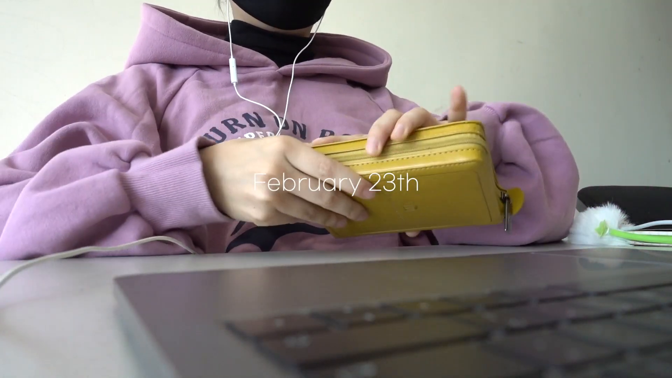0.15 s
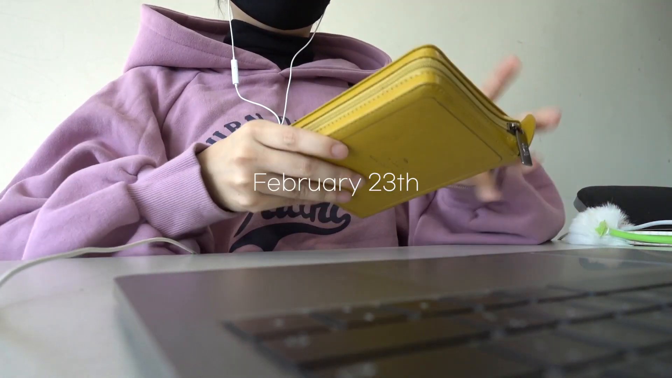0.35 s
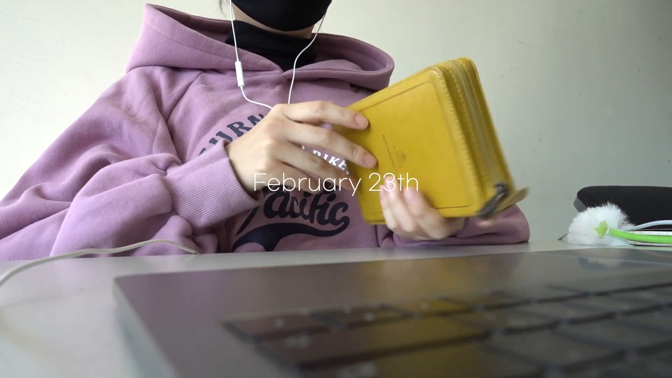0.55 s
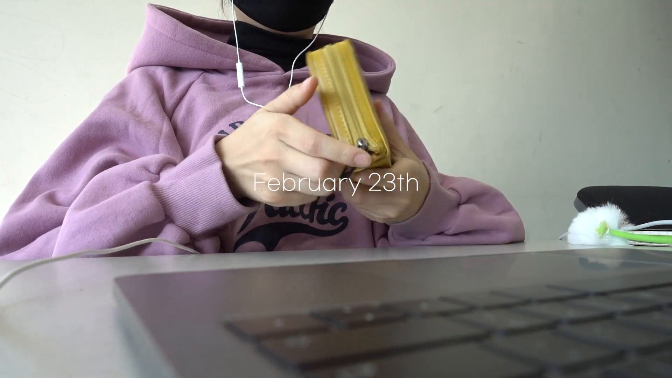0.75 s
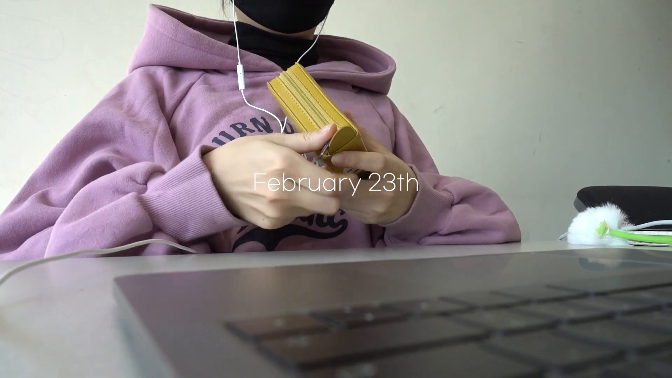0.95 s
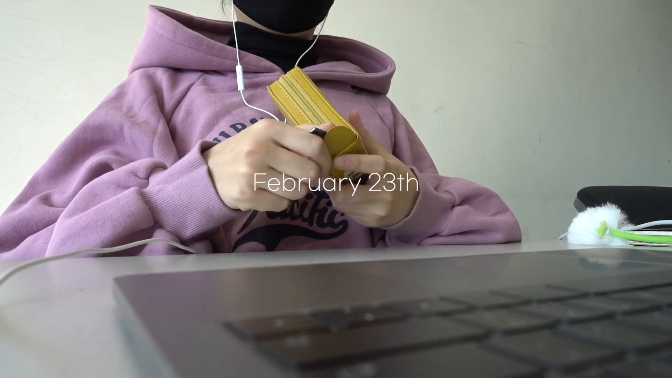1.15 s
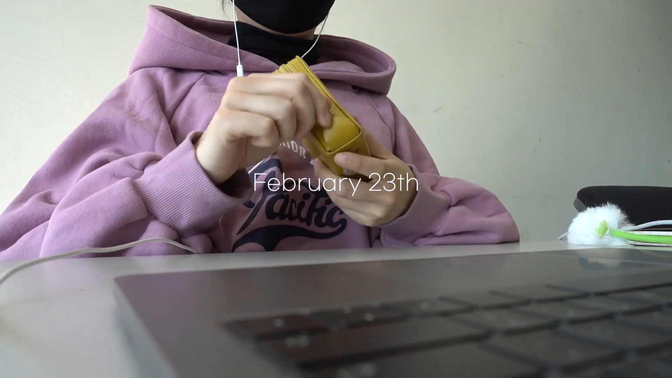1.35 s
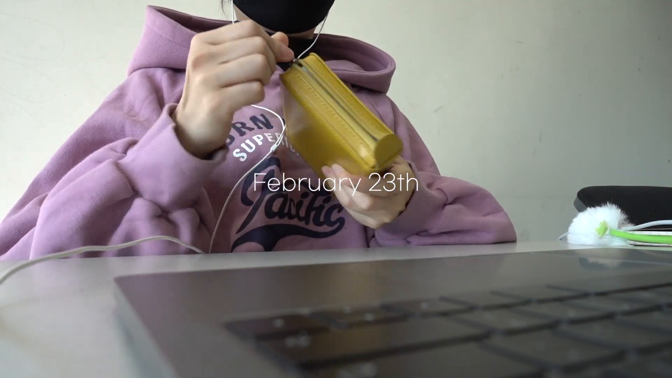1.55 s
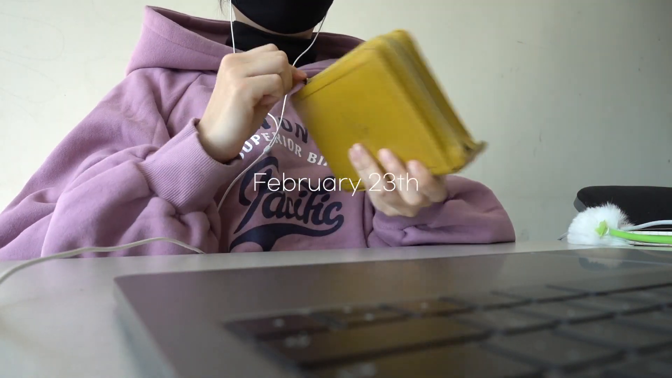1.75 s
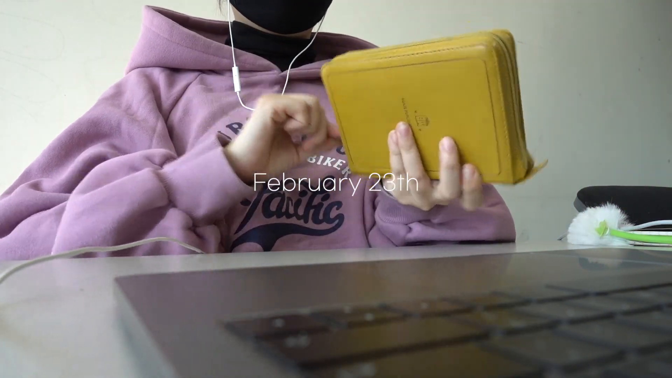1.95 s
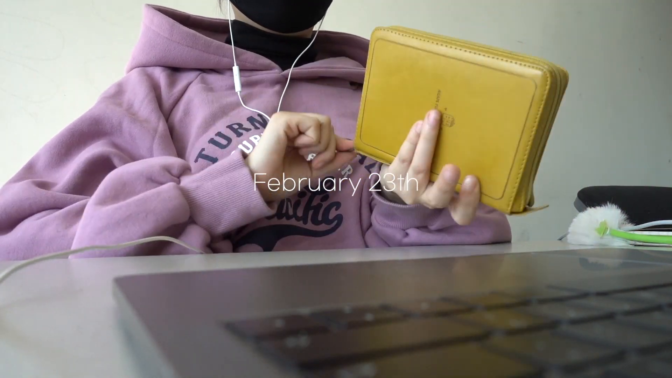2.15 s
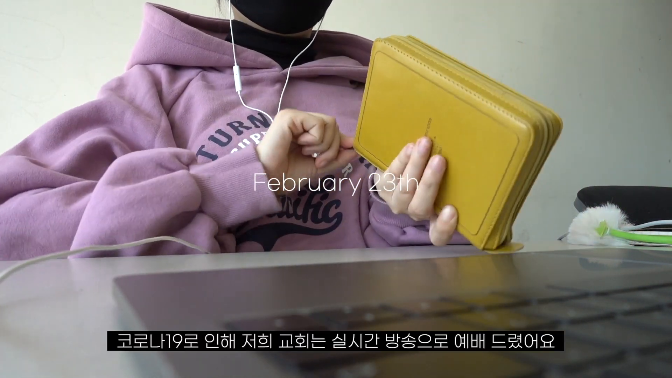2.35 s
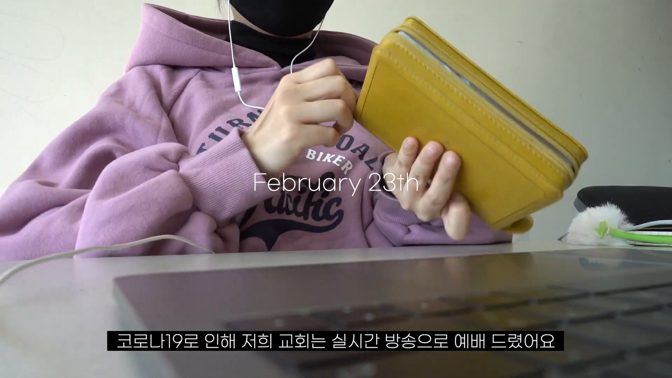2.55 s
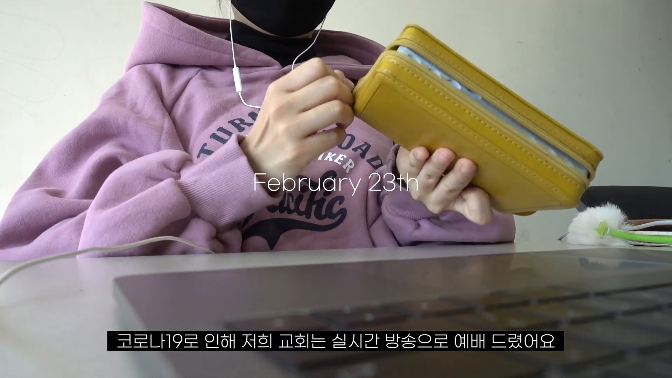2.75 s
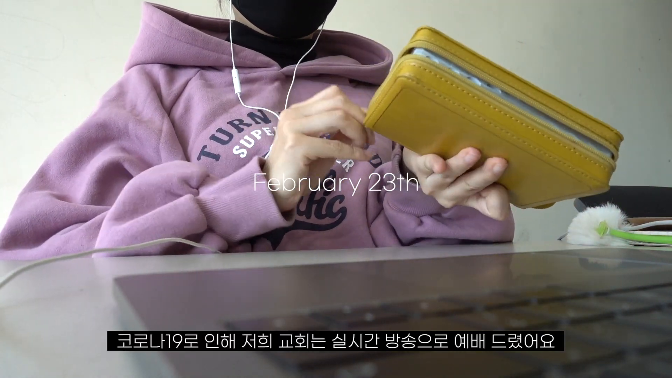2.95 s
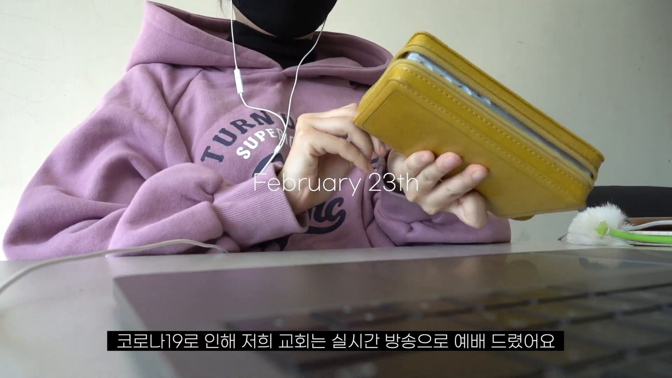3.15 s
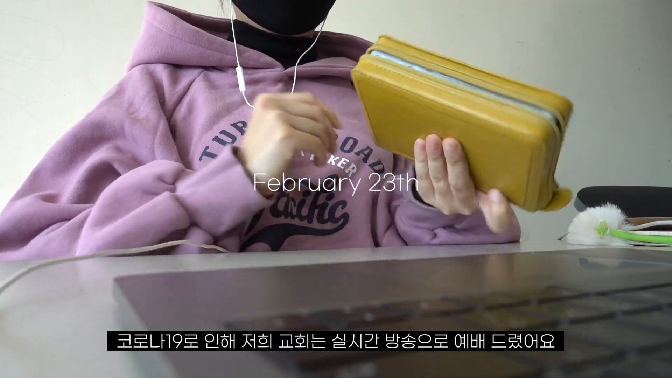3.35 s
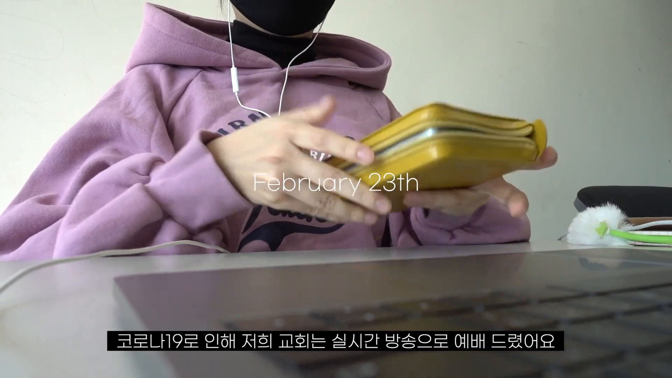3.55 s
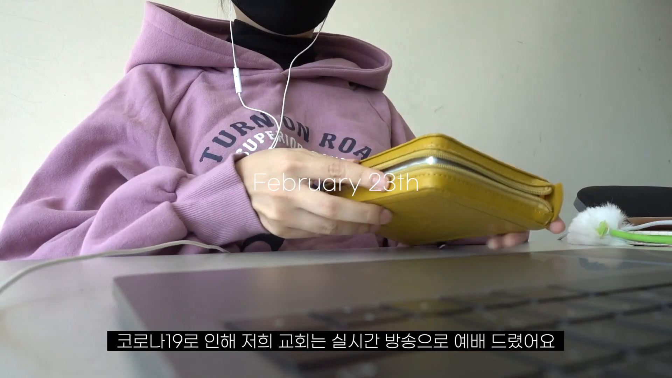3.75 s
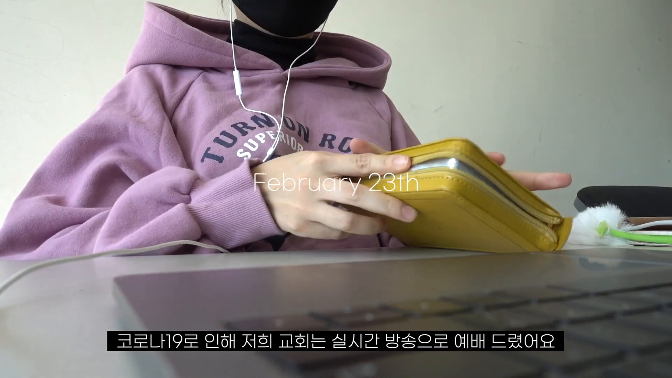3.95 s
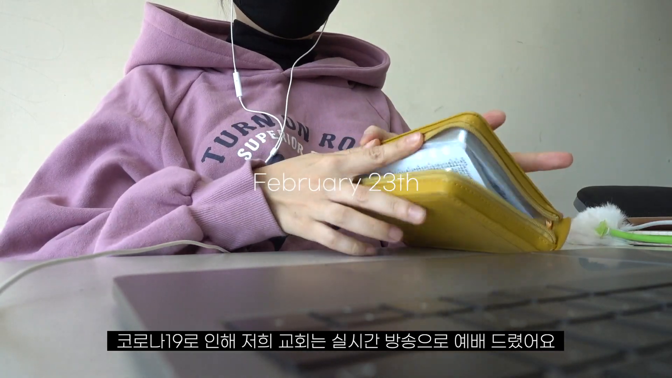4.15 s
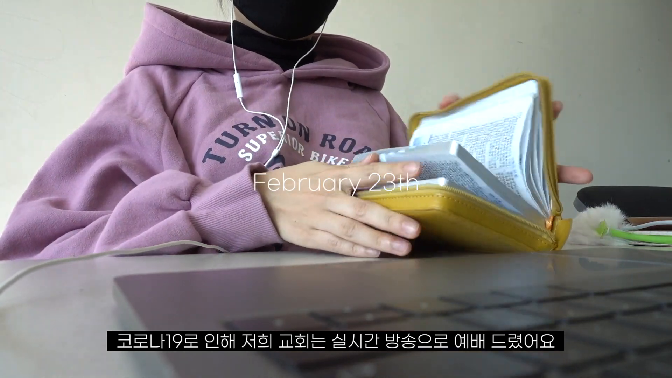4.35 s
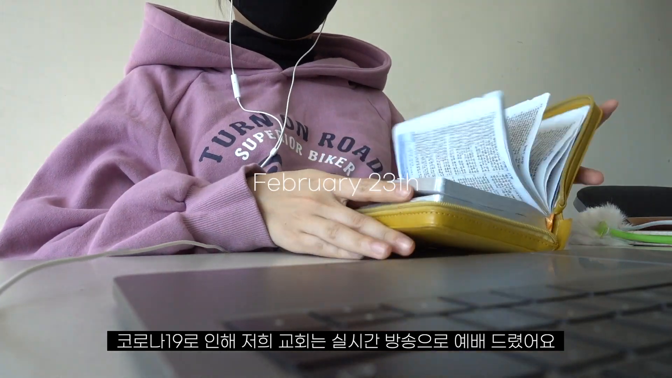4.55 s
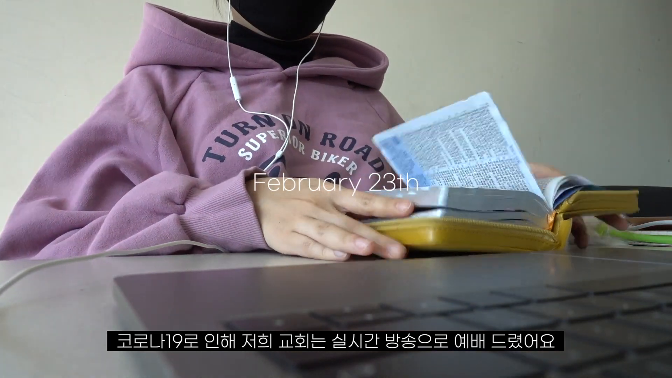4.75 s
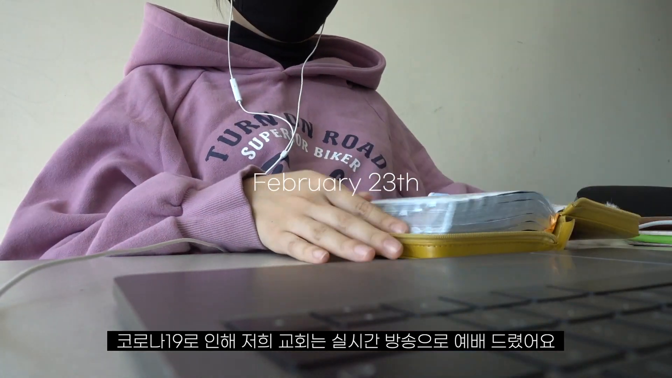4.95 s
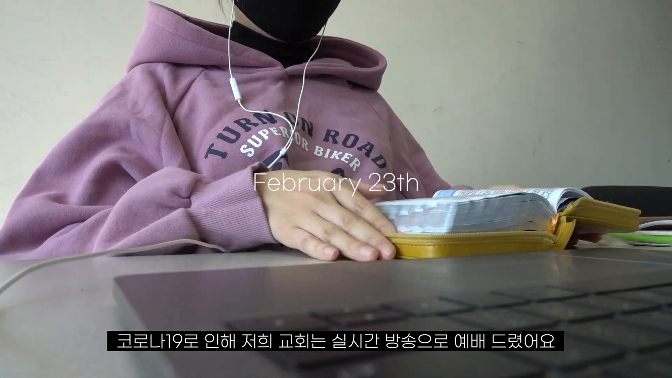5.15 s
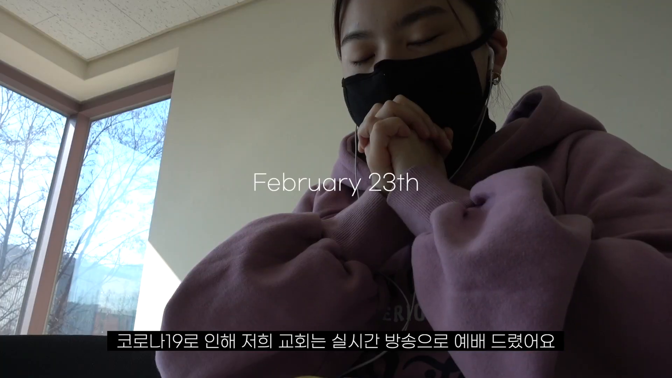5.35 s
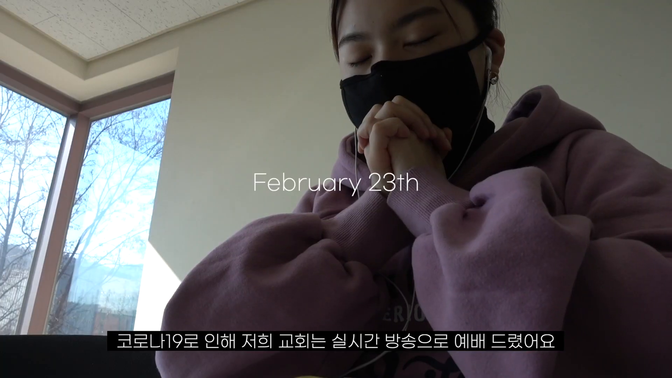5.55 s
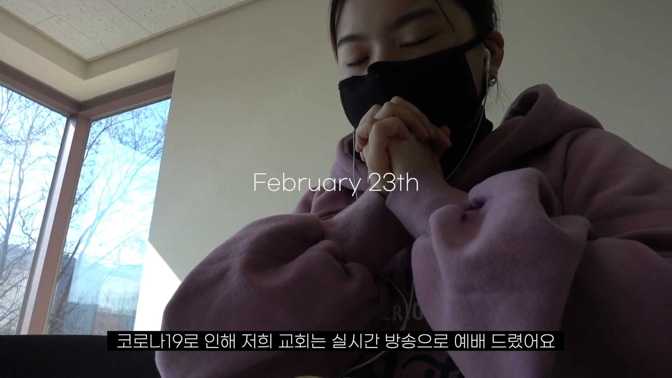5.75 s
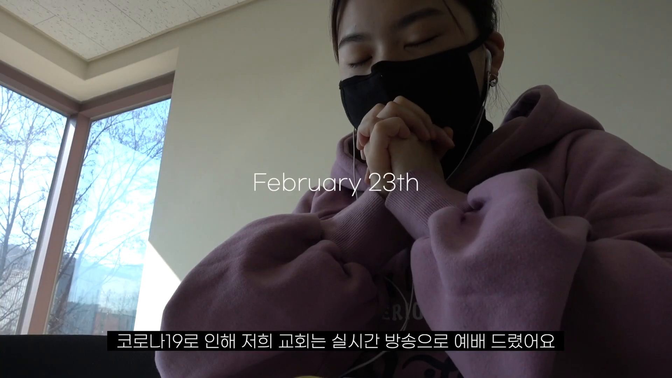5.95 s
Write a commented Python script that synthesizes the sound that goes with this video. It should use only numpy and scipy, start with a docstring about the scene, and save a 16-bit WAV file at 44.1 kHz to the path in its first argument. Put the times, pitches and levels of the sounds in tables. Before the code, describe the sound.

Close stereo microphone in a small quiet room with a faint fan hum. Hands tap and rub a leathery book case, then pull its zip in three quick, buzzing strokes, the last two rising sharply. After light handling comes a fainter, slower ticking stroke. The case lands with a hard clattering knock, then opens with thumps, page rustles and sharp taps. Handling cuts off suddenly, leaving only the fan.

```python
"""A zipped book case on a desk

Close to a stereo microphone, hands turn a book case, pull its zip in four strokes, drop it and open it. Clicks
ring the zip, short pushes ring the case, and shaped noise makes rubbing, rumble and a small room. A fan hums
below, from noise and wavering tones; near the end the near sounds, their room echo and a bright hiss cut off
together, leaving the fan."""
import sys
import numpy as np
from scipy import signal
from scipy.fft import rfft, irfft
from scipy.io import wavfile
from scipy.ndimage import uniform_filter1d

SR = 44100
rng = np.random.default_rng(int(sys.argv[2]) if len(sys.argv) > 2 else 0)


def boost(x):
    """Linear amplitude factor 10**(x/20) for a level x in decibels (scalar or array-like)."""
    u = np.asarray(x, float) / 20
    return 10 ** u


def materialize(psi):
    """Save the field psi as 16-bit PCM at rate SR to the path in sys.argv[1].

    A 1-D psi becomes a single channel; in a 2-D psi each row is a channel.
    """
    bounded = np.clip(np.atleast_2d(psi).T, -1, 1)
    quanta = np.round(bounded * 32767).astype(np.int16)
    wavfile.write(sys.argv[1], SR, quanta)


N = 268915
T = np.arange(N) / SR
CUT_S = 5.279  # near sounds, their room echo and the hiss cut off here


def level(x, db):
    """Scale a sound to an rms level in dB."""
    return x * boost(db) / np.sqrt(np.mean(x ** 2))


def band(x, lo_hz, hi_hz, order=2):
    """Keep only the frequencies between two limits."""
    return signal.sosfilt(signal.butter(order, [lo_hz, hi_hz], "band", fs=SR, output="sos"), x)


def ring(x, modes):
    """Let x set off resonances (f/Hz, width/Hz, level/dB) and add them with alternating sign."""
    total = 0
    for k, (hz, width, db) in enumerate(modes):
        b, a = signal.iirpeak(hz, hz / width, SR)
        total = total + (-1) ** k * boost(db) * signal.lfilter(b, a, x)
    return total


def along(table, hz):
    """Read a table (f/Hz, value) on a log-frequency axis."""
    table_hz, value = np.transpose(table)
    return np.interp(np.log(hz + 1), np.log(table_hz), value)


def walk(rate):
    """Slow random wander of rms 1: about `rate` random steps per second, smoothed twice."""
    k = int(SR / rate)
    steps = np.repeat(rng.standard_normal(N // k + 1), k)
    smooth = uniform_filter1d(uniform_filter1d(steps, k), k)
    return level(smooth[:N], 0)


def fan():
    """Steady air noise, most alike in both ports in the bass, with narrow wavering tones."""
    # colour of the air noise: f/Hz, relative level per Hz/dB
    air_colour = [(24, -82.5), (40, -21), (160, -34), (295, -19.5), (382, -11), (461, -14), (773, -14),
                  (869, -15.5), (978, -12), (1460, -17), (2230, -15), (2950, -17), (3820, -27.5),
                  (5440, -27.5), (11000, -33.5), (14300, -71), (22000, -120)]
    # likeness of left and right: f/Hz, likeness from -1 to 1
    likeness = [(60, 0.99), (130, 0.61), (270, 0.93), (580, 0.88), (1230, 0.37), (2610, 0.12),
                (5540, -0.35), (11800, 0.2)]
    # fan tones: f/Hz, level/dB, rms wander/Hz, rms waver before levelling/dB
    hum = [(384, -62, 3, 1.3), (785, -71.5, 2, 3), (973, -75.5, 2.3, 3.5), (1177, -68, 1.3, 2.2),
           (1367, -78, 1.5, 3), (1570, -75.5, 1.5, 3)]
    hz = np.fft.rfftfreq(N, 1 / SR)
    alike = np.clip(along(likeness, hz), -1, 1)
    mid, side = rfft(rng.standard_normal((2, N))) * np.sqrt([1 + alike, 1 - alike])
    spectrum = np.array([mid + side, mid - side]) * boost(along(air_colour, hz))
    air = level(irfft(spectrum, N), -57)
    tones = 0
    for f, db, wander, waver_db in hum:
        phase = 2 * np.pi * np.cumsum(f + wander * walk(8)) / SR
        tones = tones + level(boost(waver_db * walk(10)) * np.sin(phase), db)
    # until the near sounds cut off, a brighter hiss lies over the fan
    hiss = level(band(rng.standard_normal((2, N)), 1000, 9100, order=1), -69) * (T < CUT_S)
    return air + tones + hiss


def shifts():
    """The soft case shifts in the hands: low noise that swells and fades."""
    # shifts of the case: t/s, peak level/dB, time to fade by 60 dB/s
    shift_list = [(0.15, -56.5, 0.48), (0.6, -62, .25), (0.75, -66, 0.3), (0.975, -70, .3),
                  (1.2, -67, 0.15), (3.53, -63, 0.63), (3.82, -41, 0.26), (3.92, -70, 0.15),
                  (4.011, -56, 0.93), (4.36, -61, 0.63), (4.69, -54.5, 0.2), (4.82, -51.5, 0.44),
                  (4.95, -48, 0.37)]
    swell = 0
    for s, db, t60 in shift_list:
        # the swell takes 0.66 of the fade time
        time_60db = np.where(T < s, 0.66 * t60, t60)
        swell = swell + boost(db - 60 * np.abs(T - s) / time_60db)
    return swell * level(band(rng.standard_normal(N), 160, 495), 0)


def sliding(column, t):
    """Level in dB of the sliding hands and pages (column 1: body, 2: treble); silent between spells."""
    # one table for each spell of handling: t/s, level of the body/dB, level of the treble/dB
    spells = [
        [(0.0, -64, -75), (0.35, -63.5, -83), (0.525, -58, -65.5), (0.68, -65.5, -81), (0.95, -57.5, -66),
         (1.125, -67, -87), (1.22, -58, -70), (1.35, -60.5, -74)],
        [(2.15, -56.5, -75), (2.37, -68.5, -92), (2.57, -58, -66.5), (2.7, -70, -92), (2.81, -64, -78)],
        [(3.12, -60.5, -74), (3.3, -64.5, -81), (3.48, -59.5, -70), (3.645, -57, -67), (3.746, -58, -71)],
        [(3.75, -34, -60), (3.78, -30, -58), (3.81, -27.5, -48.5), (3.84, -38.5, -54), (3.92, -43.5, -70),
         (4.0, -56.5, -63), (4.07, -61.5, -82), (4.18, -58, -73), (4.24, -48.5, -60), (4.3, -54.5, -67),
         (4.36, -41.5, -50.5), (4.42, -50.5, -58.5), (4.48, -48, -56), (4.6, -48, -75.5), (4.68, -45, -59),
         (4.72, -53, -58.5), (4.8, -34.5, -57), (4.87, -47.5, -59), (4.97, -43.5, -56), (5.12, -43.5, -56),
         (5.18, -52.5, -63), (5.26, -54, -65), (5.281, -39.5, -44)],
    ]
    levels = []
    for spell in spells:
        spell = np.array(spell)
        levels.append(np.interp(t, spell[:, 0], spell[:, column], -200, -200))
    return np.max(levels, axis=0)


def rub(grains=900, uneven_db=4.0, grain_s=0.00086, smooth=1.45, patchy_db=1.0):
    """Dense little slips of skin, cloth and paper, of very uneven size, shake out noise."""
    size_db = uneven_db * np.minimum(rng.exponential(1, N), 3)
    slips = (rng.random(N) < grains / SR) * boost(size_db)  # about `grains` slips per second
    fade = np.exp(-1 / (grain_s * SR))
    # a steady part plus a short burst at every slip
    noise = (smooth + signal.lfilter([1], [1, -fade], slips)) * rng.standard_normal(N)
    body = band(ring(noise, [(1200, 1720, 6.5), (2500, 1720, 11.5), (3370, 3400, -6.5)]), 260, 6340)
    treble = band(noise, 5800, 11500)
    body = level(body, 0) * boost(sliding(1, T) + patchy_db * walk(14))
    treble = level(treble, 0) * boost(sliding(2, T) + patchy_db * walk(14))
    return body + treble


def blow(push, hz, spread):
    """A push rings the modes of the case that lie near its centre; peak 1."""
    # low modes are the cover, high ones the stiff skin and pages: f/Hz, width/Hz, relative level/dB
    case_modes = [(172, 54, -7), (275, 74, 12.5), (360, 50, 6.5), (513, 82, -1.5), (673, 112, 3),
                  (756, 117, 2.5), (898, 103, 2), (1200, 313, 1), (1670, 394, 4), (2020, 530, 6),
                  (2553, 880, 4), (3170, 616, 3), (3910, 690, 0), (4105, 1180, -3.5)]
    near = []
    for f, width, db in case_modes:
        distance = np.log(f / hz) / spread
        near.append((f, width, db - 4 * distance ** 2))
    y = band(ring(push, near), hz / 4, min(hz * 3.2, 5500))
    return y / np.abs(y).max()


def thumps(spread=0.18, rumble=0.046):
    """A soft blow starts the low modes, and the settling cover keeps them rumbling."""
    # dull knocks of the cover on hand and desk: t/s, peak/dB, centre f/Hz, rumble's time to fade by 60 dB/s
    knocks = [(0.076, -42.5, 594, 0.18), (0.154, -39, 368, 0.065), (0.587, -49, 683, 0.066),
              (0.72, -44.5, 680, 0.031), (2.815, -47.5, 668, 0.08), (3.485, -41, 604, 0.091),
              (3.565, -60, 781, 0.08), (3.747, -23, 770, 0.13), (3.768, -22, 766, 0.071),
              (3.809, -47, 744, 0.078), (3.988, -39, 510, 0.14), (4.265, -26.5, 420, 0.13),
              (4.284, -38, 390, 0.23), (4.329, -32.5, 870, 0.28), (4.677, -45, 674, 0.098),
              (4.7, -27, 481, 0.21), (4.768, -36, 480, 0.35), (4.838, -34.5, 496, 0.096),
              (4.905, -21, 830, 0.069)]
    out, t = np.zeros(N + 8192), T[:8192]
    for s, db, hz, t60 in knocks:
        push = rumble * rng.standard_normal(8192) * 1000. ** (-t / t60)
        push[0] += 1
        at = int(s * SR)
        soft_push = band(push, hz * 0.24, hz * 1.75)
        out[at:at + 8192] += boost(db) * blow(soft_push, hz, spread)
    return out[:N]


def crackles(count=60, over_db=12, scatter_db=3, hz=1900, tick_db=12, contact_ms=2.7):
    """Faint random taps that come with the sliding and follow its level."""
    when = rng.random(count) * CUT_S
    chance = rng.standard_normal((count, 3))
    found = []
    for s, (a, b, c) in zip(when, chance):
        peak_db = sliding(1, s) + over_db + scatter_db * a
        thin_db = sliding(2, s) + tick_db + scatter_db * c
        found.append((s, peak_db, hz * np.exp(.3 * b), thin_db, contact_ms))
    return found


def taps(spread=0.64, edge=6, tick_gain_db=9):
    """A sharp edge, then a rough contact of a few ms rings the skin; a thin tick lies on top."""
    # taps and crackles of case and pages, levels before panning:
    # t/s, peak of the ring/dB, centre f/Hz, peak of the tick before tick_gain_db/dB, contact fade/ms
    tap_list = [(0.0772, -27, 1810, -52, 1.1), (0.1512, -35, 2170, -54, 3.6), (0.5332, -49, 937, -54, 3.6),
                (0.6078, -41.5, 926, -69, 2.3), (0.7236, -30, 2540, -63, 0.61),
                (0.741, -47, 1180, -51, 1.3), (0.822, -43, 2320, -44.5, 2.3),
                (0.851, -34.5, 2500, -56, 5.6), (0.9398, -35.5, 2330, -35, 1.5),
                (1.021, -27, 2640, -49, 0.33), (1.2506, -37, 2020, -61, 3.3), (1.62, -33, 3300, -44, 1),
                (1.812, -25, 2500, -45, 1.5), (2.027, -21, 1600, -45, 1.5),
                (2.3456, -37.5, 2110, -69, 0.89), (2.5754, -45, 970, -66, 1.5),
                (3.3829, -40, 2120, -46.5, 1.4), (3.4432, -34, 1720, -40, 3), (3.476, -38, 2130, -48, 2),
                (3.4859, -35.5, 1090, -67, 3.2), (3.5595, -37, 2140, -54, 1.5),
                (3.5855, -42, 1920, -53, 2.3), (3.62, -39, 2170, -61, 1.7), (3.6459, -28, 2100, -48.5, 2.5),
                (3.71, -41, 2250, -66, 1.4), (3.7478, -13.5, 2930, -41, 3.1), (3.7581, -24, 1120, -43, 2),
                (3.768, -14.5, 3000, -45, 2), (3.772, -15.5, 2920, -52, 3.2), (3.779, -20, 3080, -58, 2.7),
                (3.8016, -15.5, 2120, -54, 3.1), (3.811, -31, 2880, -55, 2.3),
                (3.8294, -16.5, 2500, -34.5, 1.4), (3.9906, -36, 960, -59, 2.7),
                (4.1565, -37.5, 920, -65, 2.2), (4.2668, -29, 870, -50.5, 2.4),
                (4.3303, -19.5, 1090, -51, 2.7), (4.3628, -17, 1430, -55, 2),
                (4.373, -13.5, 2140, -42, 0.82), (4.4036, -19.5, 1400, -46, 1.7),
                (4.4137, -25, 1510, -50, 2.5), (4.4336, -27, 1780, -50, .69),
                (4.4661, -22.5, 2700, -33, 0.93), (4.477, -28, 2700, -50, 2.5), (4.494, -37, 2500, -44, 2),
                (4.517, -37, 3000, -45, 1), (4.526, -34, 2000, -56, 1), (4.627, -25, 1730, -58, 1.4),
                (4.676, -8, 1850, -43, 0.95), (4.6802, -9.5, 1200, -34.5, 1.5),
                (4.6995, -36, 2440, -53, 1.3), (4.769, -26, 1870, -57, 2), (4.784, -22.5, 1810, -43, 3.5),
                (4.8034, -24, 1610, -43, 1.2), (4.8093, -15.5, 2630, -32, 1.3),
                (4.8156, -16.5, 1730, -36, 1.1), (4.8706, -21, 1870, -58, 1.8), (4.89, -24, 1540, -57, 2.3),
                (4.907, -12.5, 1500, -60, 2.1), (4.9498, -26, 1375, -42, 1.6),
                (4.9712, -18, 3620, -34.5, 2.7), (5.0, -27.5, 1540, -40, 3.1),
                (5.0035, -26, 2750, -59, 3.4), (5.0614, -28, 3100, -56, 1.6), (5.1111, -24, 2700, -52, 6.2),
                (5.2722, -35, 1590, -50, 1.6), (5.2765, -34, 1800, -53, 2.8)]
    out, t = np.zeros((2, N + 4096)), T[:4096]
    for s, db, hz, tick_db, contact_ms in tap_list + crackles():
        push = rng.standard_normal((2, 4096)) * np.exp(-1000 * t / contact_ms)
        push[0, 0] += edge
        tick = band(push[1], 6300, 11900)
        tick = tick / np.abs(tick).max()
        hit = boost(db) * blow(push[0], hz, spread) + boost(tick_db + tick_gain_db) * tick
        at = int(s * SR)
        pan_db = -1.8 + 4 * rng.standard_normal()  # left minus right
        out[:, at:at + 4096] += hit * boost([[pan_db / 2], [-pan_db / 2]])
    return out[:, :N]


def zip_teeth(scatter_db=1.2, rasp_s=.0012, scrape_db=-13, flex_db=1.6, brisk=500, heft=.5):
    """Each tooth that the slider parts is one click; faster pulls turn the clicks into a rising buzz."""
    # what one tooth rings in the tape and in the slider: f/Hz, width/Hz, relative level/dB
    tape_modes = [(262, 85, -13.5), (546, 266, -9.5), (1090, 534, -3), (1600, 880, -1.5), (1990, 470, 3.5),
                  (2500, 790, 0), (3000, 730, 0.5), (3900, 930, -7.5)]
    slider_modes = [(6750, 2300, -6.5), (7270, 470, 0.5), (9600, 3400, -7.5)]
    # slider speed, one table per stroke: t/s, speed/(teeth per s)
    speeds = [
        [(1.349, 30), (1.39, 45), (1.41, 78), (1.455, 120), (1.49, 250), (1.538, 610), (1.556, 520),
         (1.566, 580), (1.577, 860), (1.582, 780), (1.6, 110), (1.64, 100)],
        [(1.654, 130), (1.675, 170), (1.73, 620), (1.765, 1040), (1.78, 1065), (1.8, 975), (1.814, 960),
         (1.819, 500), (1.845, 250)],
        [(1.853, 115), (1.92, 115), (1.94, 250), (1.965, 540), (1.995, 880), (2.01, 1020), (2.023, 945),
         (2.032, 400)],
        [(2.924, 48), (2.971, 111), (2.995, 122), (3.006, 150), (3.018, 112), (3.056, 200), (3.095, 150)],
    ]
    # force of the pull, one table per stroke: t/s, level of the teeth before shake and speed weighting/dB
    pulls = [
        [(1.349, -48.5), (1.38, -54), (1.415, -45), (1.43, -52), (1.49, -48.5), (1.538, -35), (1.562, -33),
         (1.576, -24), (1.583, -40), (1.64, -48.5)],
        [(1.654, -45.5), (1.69, -37.5), (1.73, -34.5), (1.755, -28), (1.77, -33), (1.782, -28.5), (1.79, -30.5),
         (1.808, -28), (1.82, -37), (1.845, -36.5)],
        [(1.853, -45), (1.9, -50), (1.965, -28), (1.98, -31.5), (2.0, -26.5), (2.01, -26), (2.024, -26.5),
         (2.032, -33)],
        [(2.924, -61), (2.985, -42.5), (3.022, -43), (3.032, -46), (3.056, -40.5), (3.07, -47), (3.095, -59)],
    ]
    # each stroke against its teeth: metal rasp at the start/dB, rasp at the end/dB,
    # drag on the tape before speed weighting/dB, unevenness of tooth spacing/(share of a spacing)
    stroke_sound = [(-16, -9.5, 3.5, 0), (-2.5, -6.5, -3, .03), (-7, -10.5, -3.5, 0.02),
                    (-13, -3, -3, 0.05)]
    clicks, teeth, rasp = np.zeros(N + 1), np.zeros(N), np.zeros(N)
    drag, pace = np.zeros(N), np.ones(N)
    for speed, pull, (*rasp_db, drag_db, jitter) in zip(speeds, pulls, stroke_sound):
        s, rate = np.transpose(speed)
        on = (T >= s[0]) & (T < s[-1])
        pace[on] = np.interp(T[on], s, rate)
        passed = np.cumsum(pace[on]) / SR
        tooth = np.arange(int(passed[-1]) + 1)
        chance = rng.standard_normal((2, len(tooth)))
        at = np.interp(tooth + jitter * chance[0], passed, T[on])
        # fewer teeth a second at the same loudness means stronger clicks
        size = boost(scatter_db * chance[1]) * np.sqrt(SR / np.interp(at, s, rate))
        # a click between two samples is shared by both
        whole, part = (at * SR).astype(int), at * SR % 1
        clicks[whole] += size * (1 - part)
        clicks[whole + 1] += size * part
        drag[on] = boost(drag_db)
        s, teeth_db = np.transpose(pull)
        shake_db = .8 * walk(70)[on]  # the hand never pulls evenly
        teeth[on] = boost(np.interp(T[on], s, teeth_db) + shake_db)
        rasp[on] = teeth[on] * boost(np.interp(T[on], s[[0, -1]], rasp_db))
    clicks = clicks[:N]
    single_click = np.eye(1, 2048)[0]
    tape_gain = np.linalg.norm(ring(single_click, tape_modes))
    slider_gain = np.linalg.norm(ring(single_click, slider_modes))
    # every click shakes a short burst of noise out of slider and tape
    fade = np.exp(-1 / (rasp_s * SR))
    envelope = signal.lfilter([np.sqrt(1 - fade ** 2)], [1, -fade], clicks)
    burst = envelope * rng.standard_normal((2, N))
    # slow teeth only tick; a brisk pull (in teeth per s) shakes the low resonances too
    weight = np.minimum(pace / brisk, 1) ** heft
    # between slow teeth the slider is heard dragging on the tape; a brisk pull nearly hides it
    drag = drag * np.sqrt(weight * (1.025 - weight)) * rng.standard_normal(N)
    push = teeth * (clicks + boost(scrape_db) * burst[0] + drag) / tape_gain
    # the tape flexes as the slider runs, so each of its resonances swells and fades alone
    tape = 0
    for k, mode in enumerate(tape_modes):
        flex = boost(flex_db * walk(60))
        low_share = max(1 - mode[0] / 2200, 0)
        tape = tape + (-1) ** k * ring(push * flex * weight ** low_share, [mode])
    slider = ring(rasp * (burst[1] + .5 * clicks), slider_modes) / slider_gain
    # the bare edge of each tooth, heard before the tape rings
    snap = boost(-10.5) * band(teeth * clicks, 820, 5100)
    return band(tape - snap, 180, 5200) + band(slider, 5900, 11500)


def place(x, smear_s=0.0088):
    """Housing and desk scatter a near sound a little differently into each port."""
    # how much the two ports differ for a near sound: f/Hz, level of the difference part/dB
    port_difference = [(60, -7.5), (110, -14), (190, -19), (350, -31), (630, -18.5), (1130, -12),
                       (2030, -22.5), (3640, -0.5), (6550, -3.5), (11800, -4)]
    scatter = rng.standard_normal(N) * np.exp(-T / smear_s)
    turn = rfft(scatter) / np.linalg.norm(scatter)
    difference = boost(along(port_difference, np.fft.rfftfreq(N, 1 / SR)))
    side = irfft(rfft(x.mean(0)) * turn * difference, N)
    return x + side * np.array([[1], [-1]])


def room(x):
    """A small room: a decaying noise tail for each port, the treble dying first."""
    t60_s, treble_t60_s = 0.35, 0.19  # times to fade by 60 dB
    t = T[:SR // 2]
    noise = rng.standard_normal((2, len(t))) * (t > .003)
    body = band(noise, 354, 7400) * 1000. ** (-t / t60_s)
    treble = band(noise, 7000, 7600) * 1000. ** (-t / treble_t60_s)
    tail = body + treble
    # both ports share part of the tail
    tail = tail + 0.4 * tail[::-1]
    tail = tail / np.sqrt(np.sum(tail ** 2) / 2)
    return boost(-12.5) * signal.fftconvolve(x.mean(0)[None], tail, axes=1)[:, :N]


def scene():
    """Zip, taps and rubbing in the room, all cut off at CUT_S, over the fan."""
    near = place(zip_teeth() + taps() + thumps() + rub() + shifts())
    return (near + room(near)) * (T < CUT_S) + fan()


def band_limit(x):
    """A steep low-pass at the top of the band."""
    return signal.sosfilt(signal.butter(12, 12380, fs=SR, output="sos"), x)


def record(dry):
    """The microphone loses the deep bass below 140 Hz, and the top is cut above 11050 Hz."""
    x = signal.sosfilt(signal.butter(2, 140, "high", fs=SR, output="sos"), dry)
    x = signal.sosfilt(signal.ellip(8, .2, 42, 11050, fs=SR, output="sos"), x)
    return band_limit(x)


dry = scene()
out = record(dry)
materialize(out)
```